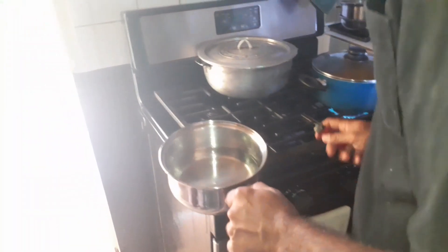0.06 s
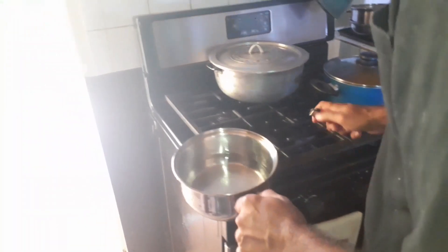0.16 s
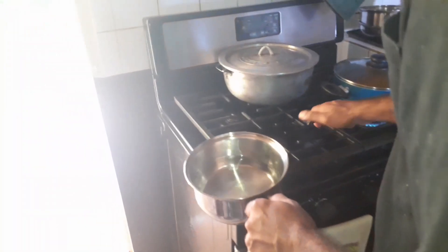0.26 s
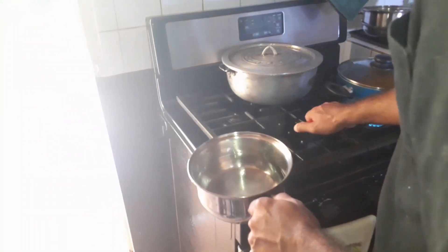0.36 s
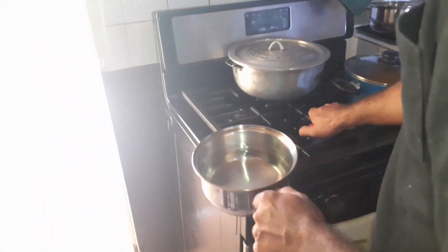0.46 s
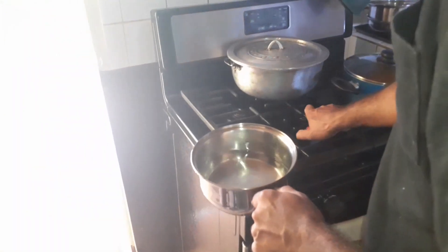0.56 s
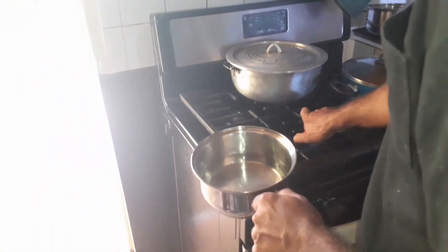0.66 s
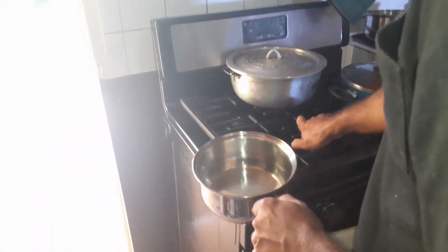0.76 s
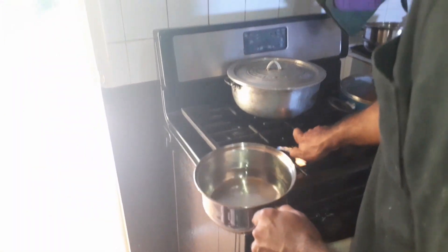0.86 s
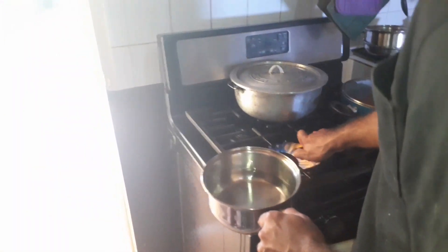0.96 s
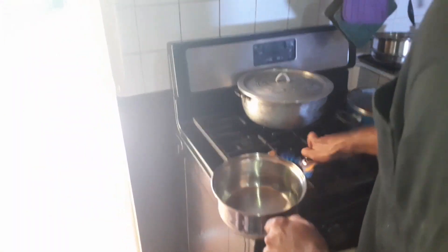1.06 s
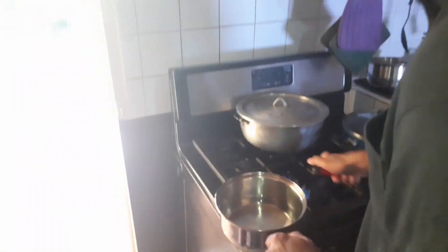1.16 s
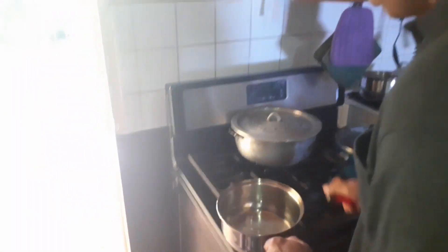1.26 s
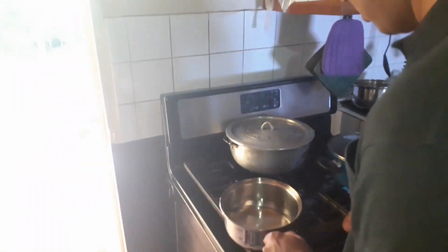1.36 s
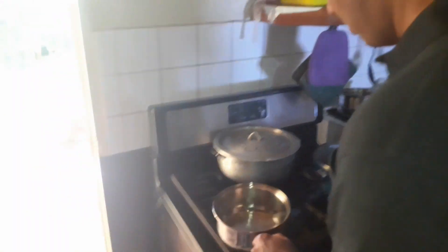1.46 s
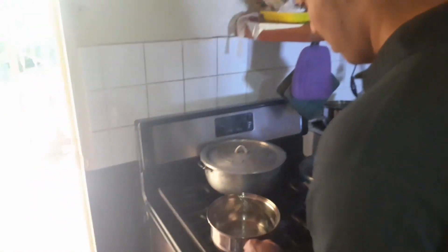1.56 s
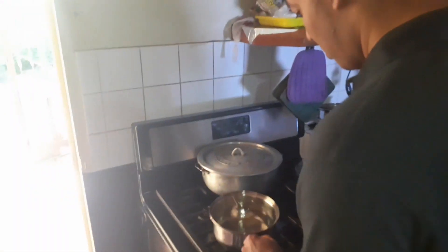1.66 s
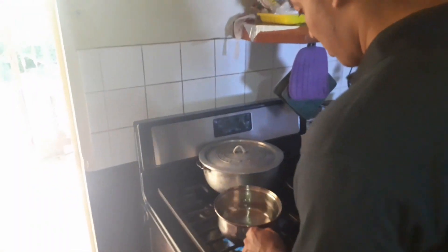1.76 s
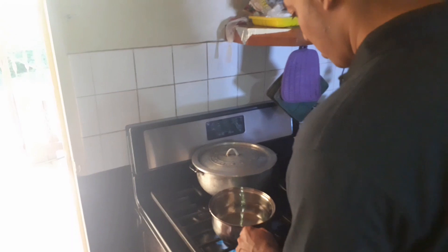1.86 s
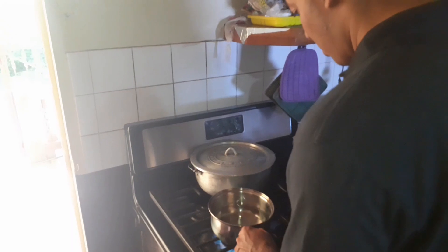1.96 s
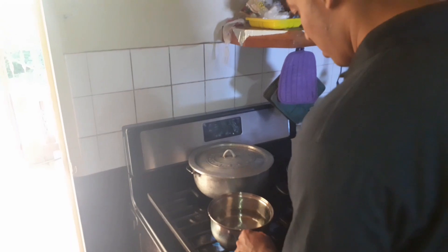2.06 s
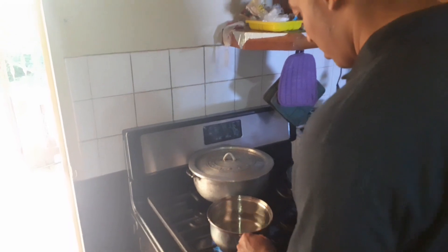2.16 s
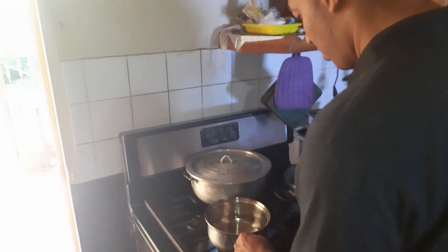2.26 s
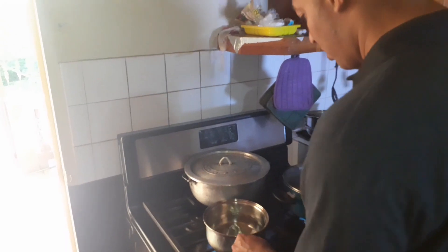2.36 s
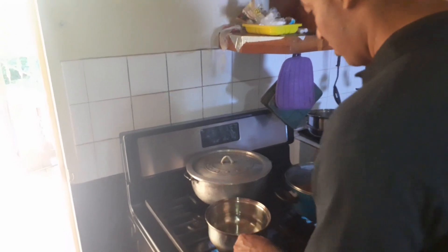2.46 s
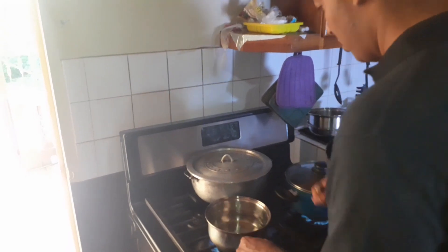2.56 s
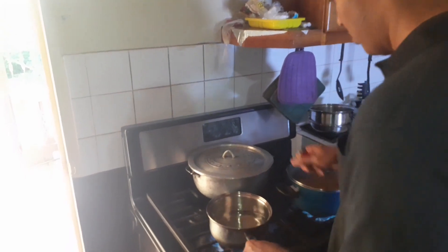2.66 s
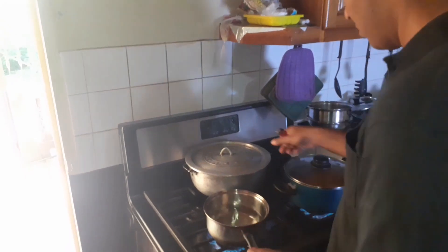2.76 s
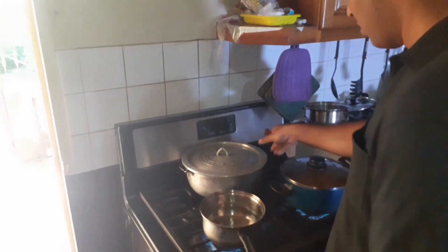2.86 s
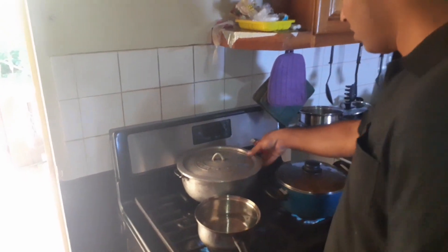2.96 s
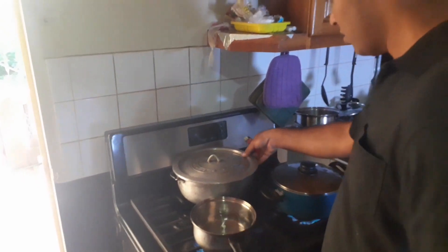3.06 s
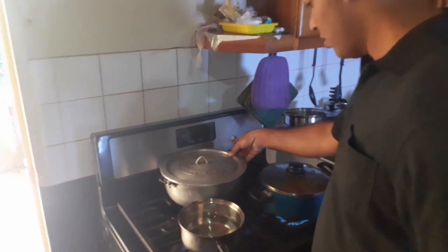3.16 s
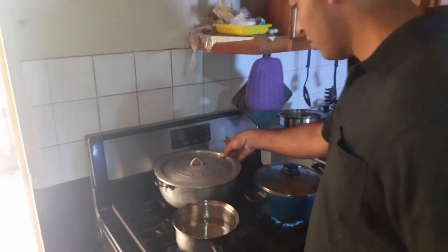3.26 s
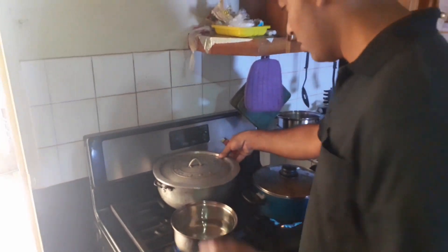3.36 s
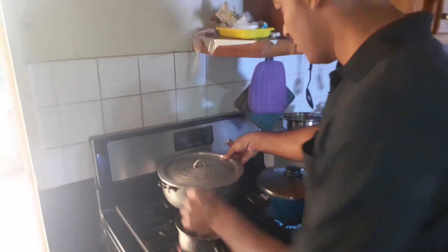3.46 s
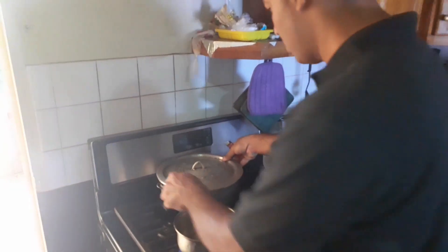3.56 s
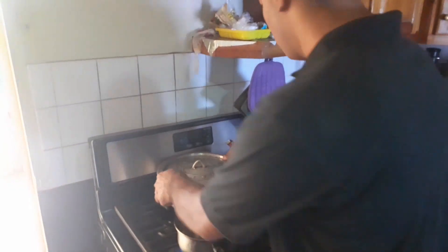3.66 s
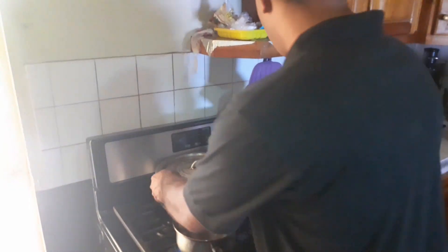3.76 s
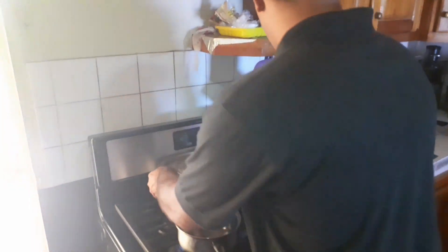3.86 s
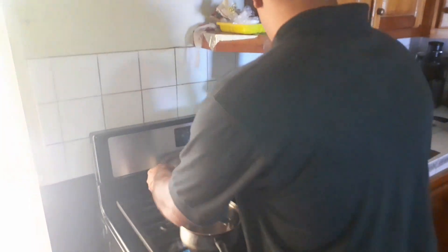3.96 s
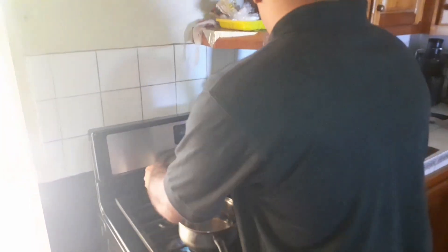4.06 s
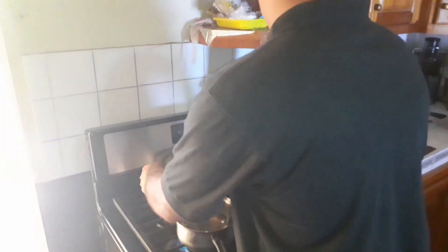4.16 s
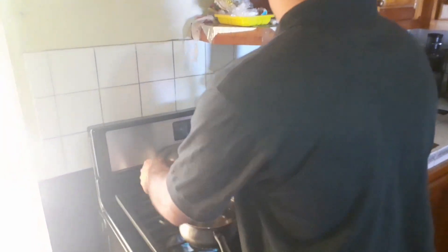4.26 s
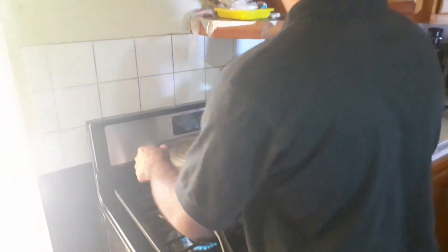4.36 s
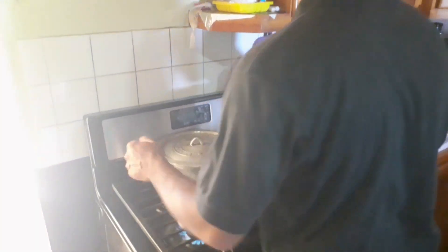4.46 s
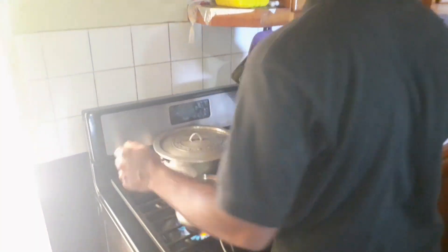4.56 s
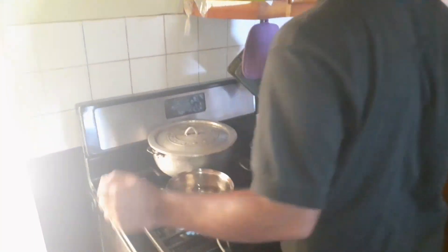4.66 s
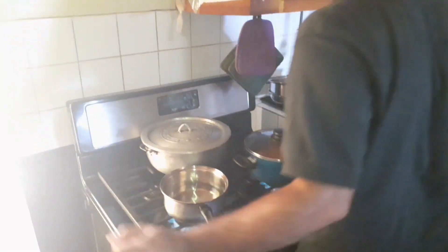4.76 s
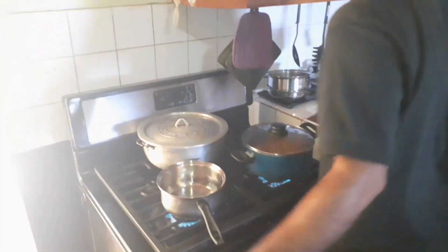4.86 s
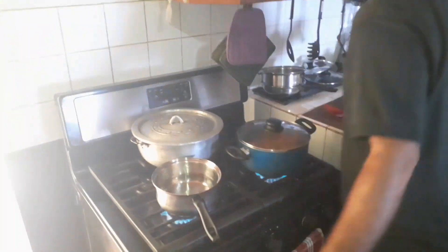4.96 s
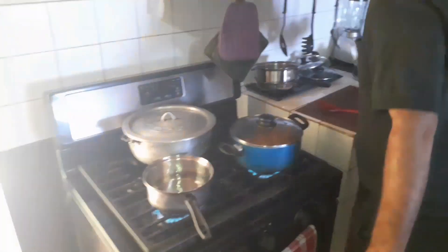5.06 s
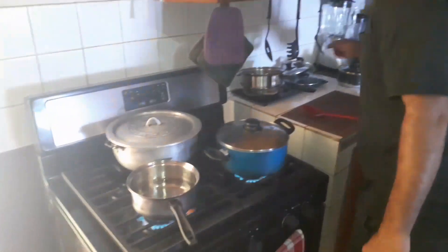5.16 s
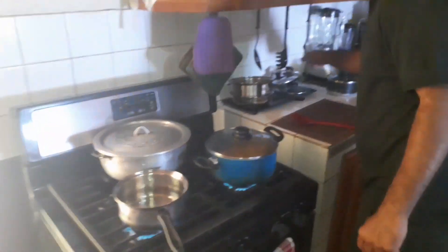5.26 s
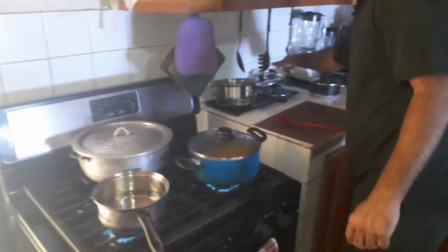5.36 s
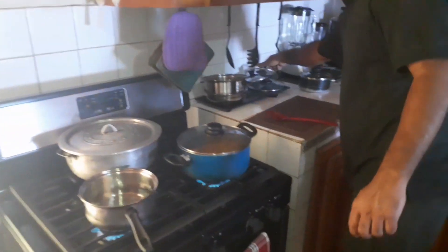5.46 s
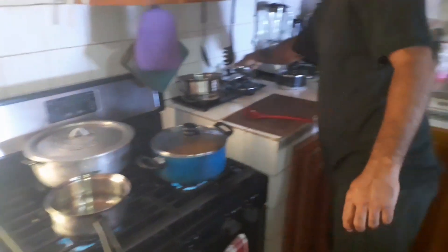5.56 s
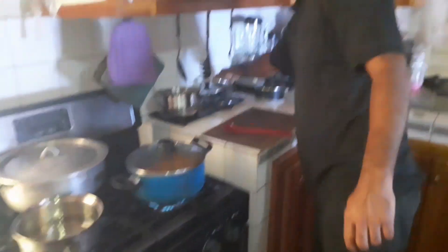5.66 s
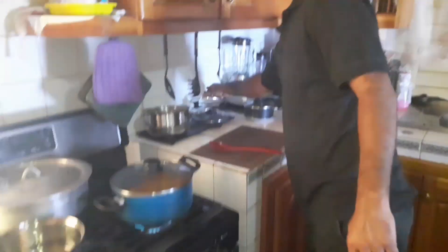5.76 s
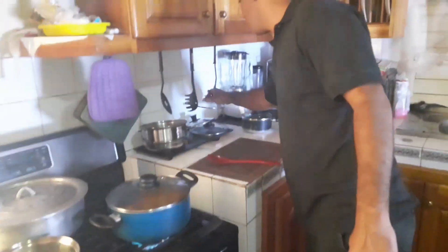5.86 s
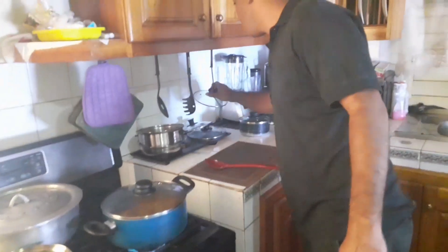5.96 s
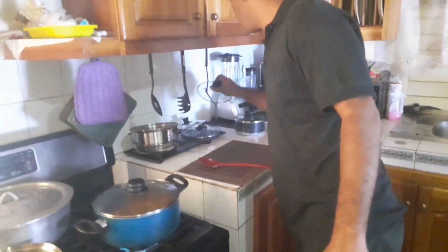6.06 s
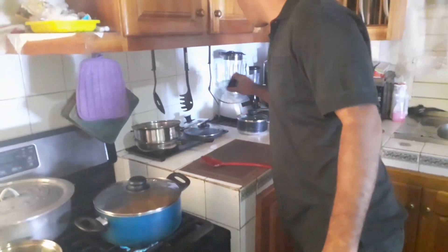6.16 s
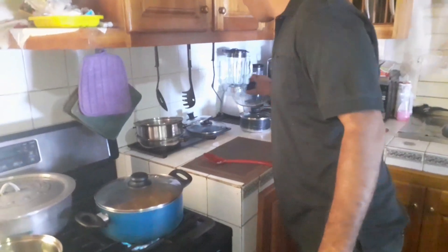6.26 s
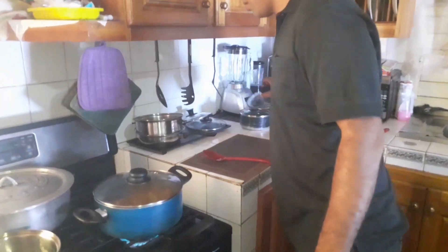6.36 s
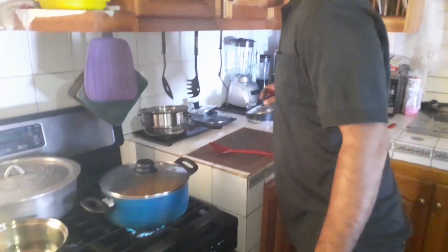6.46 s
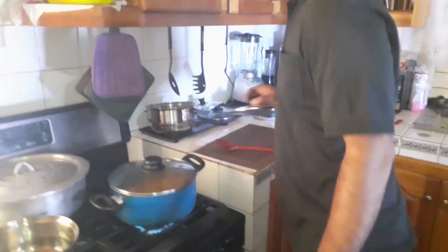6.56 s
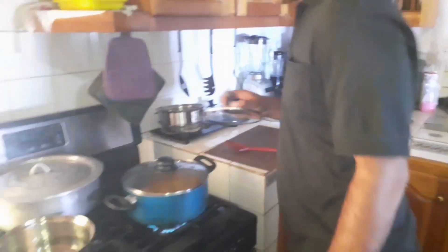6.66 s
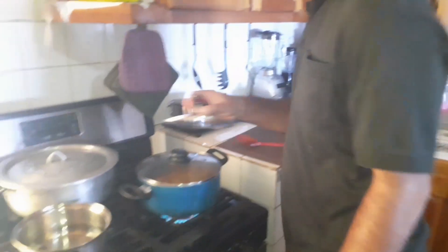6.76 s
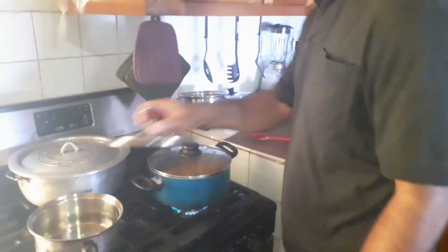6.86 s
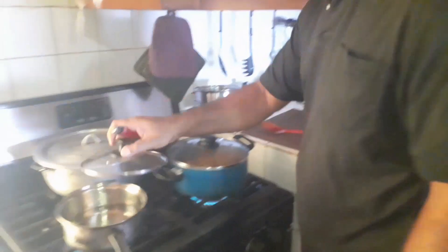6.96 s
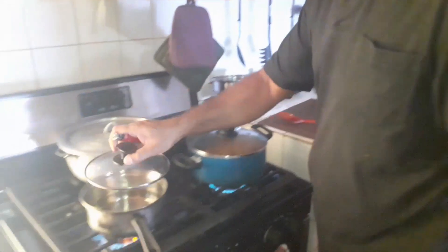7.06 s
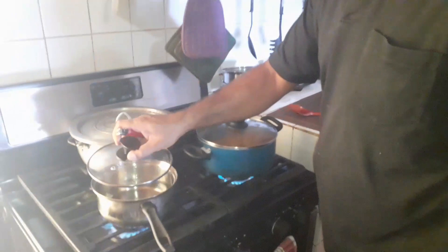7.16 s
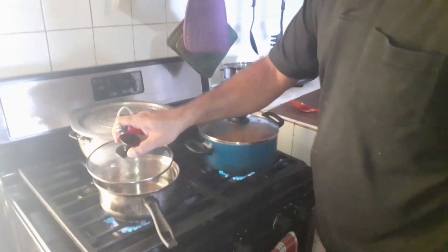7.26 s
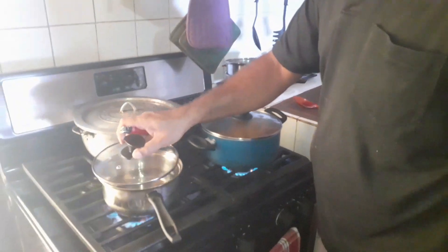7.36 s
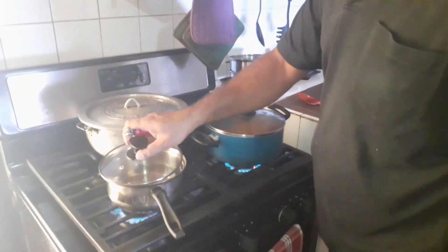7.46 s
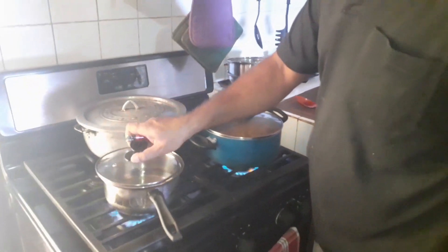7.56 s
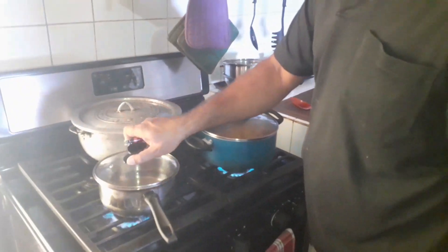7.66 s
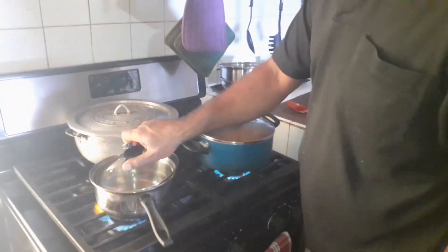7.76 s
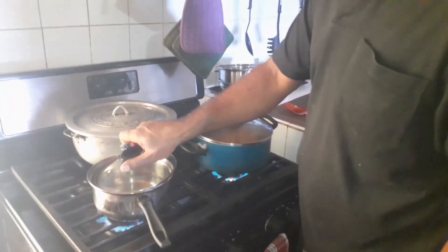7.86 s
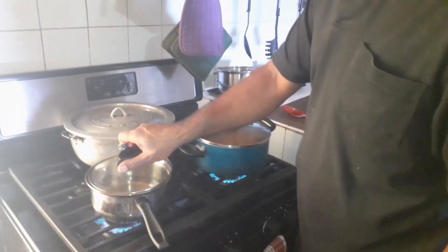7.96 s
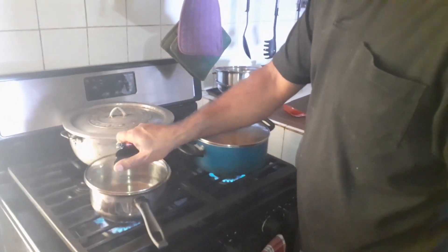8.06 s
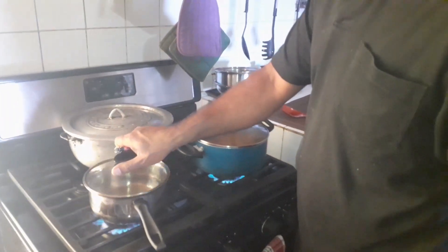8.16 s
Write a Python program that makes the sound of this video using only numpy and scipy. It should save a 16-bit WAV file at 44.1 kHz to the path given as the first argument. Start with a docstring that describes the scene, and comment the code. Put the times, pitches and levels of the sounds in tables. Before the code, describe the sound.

A gas burner softly catches, a saucepan lands on the grate, then a lid clanks loudly and rattles into place over a faint hum.

```python
"""A steel saucepan on a gas stove in a small tiled kitchen. A burner catches, the pan is set on the grate
and nudged, then a lid is fetched from the counter, clanks on the pan and is rattled into its seat.
Each impact excites the damped modes of the metal and a tail of wall echoes; blows on the pan also shake
the stove top. Motors hum, flames hiss, and the cook's hands, clothes and one step make faint sounds.
An automatic gain control ducks the level after the loud clanks."""
import sys
import numpy as np
from scipy import signal
from scipy.fft import rfft, irfft, next_fast_len
from scipy.io import wavfile
from scipy.ndimage import uniform_filter1d, map_coordinates

SR = 44100
rng = np.random.default_rng(int(sys.argv[2]) if len(sys.argv) > 2 else 0)


def generate_wav(signal):
    """Clip the signal to [-1, 1] and save it as 16-bit WAV at the path in sys.argv[1]."""
    frames = np.transpose(np.atleast_2d(signal))
    scaled = np.clip(frames, -1, 1) * 32767
    pcm = np.round(scaled).astype(np.int16)
    wavfile.write(sys.argv[1], SR, pcm)


N = 362502
BLOW_SAMPLES, TOP_HZ = SR, 15900  # longest ring of a blow; upper band limit

# Coherence of the sound field. Each row: frequency in Hz, left-right correlation.
COHERENCE = [(100, 0.99), (300, 0.9), (600, 0.74), (1200, 0), (16000, 0.054)]
# Stereo balance of sounds about the room. Each row: frequency in Hz, left minus right in dB.
ROOM_BALANCE = [(60, -15), (130, 0.5), (290, -6.5), (640, -3.5), (1410, -8.5), (3100, -6), (6820, -17.5),
                (15000, -3.5)]


def amp(db):
    """Decibels to amplitude ratio."""
    return 10 ** (np.asarray(db) / 20)


def unit(x):
    """Scale to rms 1."""
    return x / np.sqrt(np.mean(x ** 2) + 1e-20)


def along(points, hz):
    """Interpolate (Hz, value) points on a logarithmic frequency axis."""
    freqs, values = np.transpose(points)
    return np.interp(np.log(hz + 1), np.log(freqs), values)


def wobble(rate):
    """A smooth random curve with rate knots a second."""
    knots = rng.standard_normal(int(N * rate / SR) + 4)
    return map_coordinates(knots, [np.arange(N) * rate / SR])


def sides(balance_db):
    """Constant-power panning: left and right gains."""
    gains = amp(np.array([balance_db, -balance_db]) / 2)
    return gains / np.sqrt(np.mean(gains ** 2, axis=0))


def add(track, start_s, sound):
    """Superpose a sound on the track."""
    part = track[:, max(round(start_s * SR), 0):][:, :sound.shape[1]]
    part += sound[:, :part.shape[1]]


def noise(spectrum, balance, size):
    """A diffuse field of rms 1: coherent in the bass, incoherent in the treble."""
    n_fft = next_fast_len(size)
    hz = np.fft.rfftfreq(n_fft, 1 / SR)
    angle = np.arccos(np.clip(along(COHERENCE, hz), -1, 1)) / 2
    mid, side = rfft(rng.standard_normal((2, n_fft))) * [np.cos(angle), np.sin(angle)]
    pair = np.array([mid + side, mid - side]) * amp(along(spectrum, hz)) * sides(along(balance, hz))
    return unit(irfft(pair, n_fft)[:, :size])


def treble(x, gain_db, corner_hz=4200):
    """Contact hardness sets the share of high frequencies: a shelving filter."""
    low, high = (np.tile(signal.butter(2, corner_hz, kind, fs=SR, output="sos"), (2, 1))
                 for kind in ("low", "high"))
    return signal.sosfilt(low, x) + amp(gain_db) * signal.sosfilt(high, x)


def swell(rise_s):
    """Vibration builds up exponentially with time constant rise_s."""
    return 1 - np.exp(-np.arange(BLOW_SAMPLES) / SR / rise_s)


def ring(modes, balance, count, scatter_db=2):
    """Free vibration: each of count blows excites the same damped modes at new strengths and phases."""
    hz, db, t60 = np.transpose(modes)
    t = np.arange(BLOW_SAMPLES, dtype=np.float32) / SR
    shape = (count, 1, len(hz))
    strength = amp(db + scatter_db * rng.standard_normal(shape)) / np.linalg.norm(amp(db))
    spread = np.arccos(np.clip(along(COHERENCE, hz), -1, 1))
    stereo_phase = spread * rng.standard_normal(shape) * [[.5], [-.5]]
    start_phase = rng.uniform(0, 2 * np.pi, shape) + stereo_phase
    weight = np.complex64(strength * sides(along(balance, hz)) * np.exp(1j * start_phase))
    phase = np.outer(np.float32(2 * np.pi * hz), t)
    decay = np.exp(np.outer(np.float32(-np.log(1000) / t60), t))
    return (np.tensordot(weight.real, decay * np.cos(phase), 1)
            + np.tensordot(weight.imag, decay * np.sin(phase), 1))


def wash(spectrum, balance, crack_db, crack_s):
    """Reverberation: after a contact crack, wall echoes decay at each band's own rate."""
    # The tiled room. Each row: frequency in Hz, reverberation time in seconds.
    reverb_times = [(150, 0.81), (600, 0.62), (2500, 0.55), (7000, 0.41), (13000, 0.35)]
    hz, frame_s, bands = signal.stft(noise(spectrum, balance, BLOW_SAMPLES), SR, nperseg=256)
    decay = amp(-60 * frame_s / along(reverb_times, hz)[:, None])
    tail = signal.istft(bands * decay, SR, nperseg=256)[1][:, :BLOW_SAMPLES]
    return tail * (1 + amp(crack_db) * np.exp(-np.arange(BLOW_SAMPLES) / SR / crack_s))


def air_and_gas(light_s, room_db=-53, hiss_db=-58, lit_rise_db=1.5):
    """Broadband noise of room air and gas jets; the hiss rises once one more burner is lit."""
    # Background spectrum. Each row: frequency in Hz, relative density in dB.
    spectrum = [(20, -4), (60, 0), (130, 5), (230, 13.5), (360, 17), (520, 6), (1000, 3.5), (3300, -1.5),
                (5300, 3), (7300, 10.5), (8800, 4.5), (10000, -10.5), (13000, -1), (16000, -2)]
    lit = np.arange(N) / SR > light_s
    air = noise(spectrum, ROOM_BALANCE, N)
    low = signal.sosfiltfilt(signal.butter(2, 3000, fs=SR, output="sos"), air)
    room = unit(low) * amp(room_db + 0.82 * wobble(6.3))
    hiss = unit(air - low) * amp(hiss_db + lit_rise_db * lit + 0.66 * wobble(4.17))
    return room + hiss


def motor_hum(beat_hz=1.52, first_peak_s=.55):
    """Beating: among the droning motors, one runs slightly slower than the mains hum."""
    # Hum tones. Each row: frequency in Hz, level in dB, left minus right in dB.
    tones = [(65.6, -73.5, -40), (99.8, -56.5, -6), (141, -66, -14), (297, -48, -5.5)]
    mains_hz, mains_db, mains_left_db = tones[1]
    slow_motor = (mains_hz - beat_hz, mains_db - 2, mains_left_db)
    out, t = np.zeros((2, N)), np.arange(N) / SR - first_peak_s
    for hz, db, left_db in tones + [slow_motor]:
        peak = np.sqrt(2) * amp(db + 0.094 * wobble(3.7))
        phase = 2 * np.pi * hz * t + 0.19 * wobble(3.065)
        out += np.outer(sides(left_db), peak * np.sin(phase))
    return out


def resonance(centre_hz, octaves, t60):
    """One damped resonance as a band of noise; the duller the contact, the slower it builds."""
    hz = np.geomspace(20, TOP_HZ, 400)
    spectrum = np.c_[hz, -20 * np.log10(1 + (np.log2(hz / centre_hz) / octaves) ** 2)]
    rise = swell(min(12 / centre_hz, t60 / 18))
    decay = np.exp(-np.log(1000) * np.arange(BLOW_SAMPLES) / SR / t60)
    return noise(spectrum, ROOM_BALANCE, BLOW_SAMPLES) * rise * decay


def taps():
    """Light impacts of hands and utensils excite quickly damped resonances."""
    # Each row: start in seconds, level in dB, centre in Hz, width in octaves, left minus right in dB.
    contacts = [(.56, -47, 4630, .42, -2), (1.352, -47, 6700, .22, -4), (1.772, -53, 8000, 1, 0),
                (3.537, -41.5, 9800, 0.76, 3), (5.508, -48, 3940, 0.91, -1), (6.474, -46, 4270, 0.68, 0),
                (6.673, -35, 2200, .42, 5), (6.924, -38, 7700, .15, 4)]
    out = np.zeros((2, N))
    for start_s, db, hz, octaves, left_db in contacts:
        add(out, start_s, amp(db) * sides(left_db)[:, None] * resonance(hz, octaves, t60=.26))
    return out


def ignition(light_s):
    """Combustion noise: gas catches with a spit, the flame ring spreads with a whoomp and closes with a puff."""
    # Spectrum of the spit. Each row: frequency in Hz, relative density in dB.
    spit = [(350, -40), (600, -10), (2150, -10.5), (2340, -10), (2610, -12.5), (5560, -6.5), (8620, -1),
            (10500, -17), (16000, -10)]
    out, t = np.zeros((2, N)), np.arange(N) / SR
    add(out, light_s, amp(-38) * wash(spit, ROOM_BALANCE, crack_db=2, crack_s=0.0084) * swell(0.0061))
    add(out, .835, amp(-37) * wash(spit, ROOM_BALANCE, crack_db=2, crack_s=0.021) * swell(0.0013))
    add(out, .936, amp(-33) * resonance(centre_hz=454, octaves=0.65, t60=0.1))  # the puff
    whoomp = [(40, -21), (120, -4.5), (200, 0), (400, -2.5), (700, -14.5), (1500, -25), (5000, -46)]
    whoomp_db = np.interp(t, [.8, .87, .94, 1.02, 1.3], [-100, -38, -37, -41, -100])
    return out + noise(whoomp, ROOM_BALANCE, N) * amp(whoomp_db)


def metal_response(modes, spectrum, ripple_db=3, width_hz=9, damping=0.0083):
    """Damping by the grip broadens a body's main modes, over an uneven bed of lesser ones."""
    hz = np.arange(20, SR / 2, 4)
    ripple = unit(signal.convolve(rng.standard_normal(len(hz)), signal.windows.hann(27), "same"))
    bed = amp(along(spectrum, hz) + ripple_db * np.minimum(ripple, 1.5))
    power = np.zeros(len(hz))
    for mode_hz, db, _ in modes:
        band_hz = width_hz + damping * mode_hz
        power += amp(db) ** 2 / band_hz / (1 + ((hz - mode_hz) / band_hz) ** 2) ** 2
    return np.c_[hz, 20 * np.log10(np.hypot(unit(bed), .65 * unit(np.sqrt(power))))]


def metal(modes, spectrum, balance, count):
    """Impulse responses of count blows: rough partials spread by the walls, over a clean modal ring."""
    response = metal_response(modes, spectrum)
    rough = np.array([wash(response, balance, crack_db=-6, crack_s=0.042) for _ in range(count)])
    return rough + amp(-7.5) * ring(modes, balance, count)


def stove_top(balance, count):
    """Plate vibration: count thumps on the sheet-metal top, each with a shudder of the stove's body."""
    # Modes of the top. Each row: frequency in Hz, relative level in dB, t60 in seconds.
    modes = [(78, -42, 0.36), (117.6, -0.5, 0.95), (203, -30, 0.64), (215.2, 17, 0.42), (230.4, -20, 0.6),
             (268, 12, 0.18), (301.6, 3.5, 0.59)]
    # Spectrum of the shudder. Each row: frequency in Hz, relative density in dB.
    spectrum = [(30, -23), (70, -5), (120, -6), (190, -4), (320, 0), (500, -8), (1200, -20), (4000, -80)]
    shudder = np.array([wash(spectrum, balance, crack_db=-22, crack_s=.01) for _ in range(count)])
    panel = ring(modes, balance, count, scatter_db=1.5)
    return amp(3) * panel + amp(-2.5) * shudder


def grate():
    """Impact excitation: the pan lands on the iron grate, which rings and thumps the stove top."""
    # Landings. Each row: start in seconds, then relative level, treble gain and stove-top gain in dB.
    blows = [(2.112, -25, 0, -12), (2.117, -26.5, -24, -7.5), (2.27, -43.5, -4, 1), (2.41, -49.5, 24, -24)]
    # Modes of the iron. Each row: frequency in Hz, relative level in dB, t60 in seconds.
    modes = [(775, -4, .7), (845, -6, .4), (1596, -5, .3), (1647, 1, .35), (3474, -11, .4), (4936, -1, .45),
             (5272, -6, .35), (5606, -2, .3), (6177, -3, .3), (6729, 0, .45), (7224, -4, .35),
             (8672, -9, .25)]
    # Bed of lesser modes. Each row: frequency in Hz, relative density in dB.
    spectrum = [(88, -52), (150, -38), (213, -20), (280, -33), (309, -17), (601, -41), (790, -15),
                (1450, -17), (1660, -30), (1940, -28), (2220, -22), (3160, -31), (4950, -23), (6640, -14.5),
                (16000, -50.5)]
    # Stereo balance. Each row: frequency in Hz, left minus right in dB.
    balance = [(60, -4), (180, -3.5), (550, -6), (1650, -1.5), (4970, -13.5), (15000, -15)]
    out = np.zeros((2, N))
    iron = metal(modes, spectrum, balance, len(blows))
    stove = stove_top(balance, len(blows))
    for k, (start_s, db, treble_db, stove_db) in enumerate(blows):
        clank = amp(-4) * treble(iron[k], treble_db) * swell(0.00011)
        thump = amp(stove_db + 5) * stove[k] * swell(0.013)
        add(out, start_s, amp(db) * (clank + thump))
    return out


def squeaks():
    """Narrow, lightly damped resonances sound as faint squeaks and pings about the kitchen."""
    # Each row: start in seconds, level in dB, pitch in Hz, width in octaves.
    pings = [(2.413, -45.5, 2670, .03), (3.543, -46.5, 1880, .07), (4.83, -45, 600, 0.11),
             (5.469, -43, 1780, .11), (5.58, -50, 2090, .13), (5.983, -53, 3200, 0.13),
             (6.018, -43.5, 986, .25), (6.27, -47, 706, 0.18), (6.489, -44.5, 1330, 0.27),
             (6.82, -50, 870, 0.12)]
    out = np.zeros((2, N))
    for start_s, db, hz, octaves in pings:
        add(out, start_s, amp(db) * resonance(hz, octaves, t60=.45))
    return out


def rustle():
    """Friction noise of the cook's clothes swells and fades with each reach or turn."""
    # Each row: middle and half length in seconds, then level, treble gain and left minus right in dB.
    moves = [(3.26, 0.19, -49, -2, 0), (5.03, .12, -53, 6, -1.5), (5.55, 0.27, -55, 3, 0),
             (6.463, 0.56, -51.5, 1, 1.5)]
    # Spectrum of cloth. Each row: frequency in Hz, relative density in dB.
    spectrum = [(60, -4), (250, 16), (500, 9.5), (1200, 3), (3300, -3.5), (7500, 2.5), (10000, -13),
                (16000, -10.5)]
    out, t = np.zeros((2, N)), np.arange(N) / SR
    cloth = noise(spectrum, ROOM_BALANCE, N) * amp(2.7 * wobble(11))
    for middle_s, half_s, db, treble_db, left_db in moves:
        envelope = np.exp(-((t - middle_s) / half_s) ** 2 / 2)
        out += amp(db) * sides(left_db)[:, None] * treble(cloth, treble_db) * envelope
    return out


def pan_blows(bounce_loss_db=2.3, air_per_scrape=0.74):
    """Impacts on the pan: start in seconds, then relative level, treble, stove-top and air gains in dB."""
    # Nudges along the grate. Each row: start in seconds, relative level and stove-top gain in dB.
    nudges = [(3.877, -34.5, 6.5), (3.954, -30.5, -4)]
    # The lid rattling in the rim. Each row: start in seconds, relative level and scrape in dB.
    rattle = [(7.521, -16.5, 10), (7.537, -14.5, 0.5), (7.591, -22, 9), (7.609, -23, 6.5),
              (7.694, -31.5, 14.5), (7.729, -22, 7), (7.742, -16, 0), (7.791, -19.5, 2), (8.121, -42, 18),
              (8.149, -23.5, 2.5), (8.167, -28.5, 0), (8.209, -27.5, 5)]
    # How closely the lid sits. Each row: time in seconds, gain of the enclosed air in dB.
    seal = [(7.52, -1.5), (7.62, 4), (7.71, 13.5), (7.8, 3.5), (8.15, 11), (8.21, 3)]
    # nudges are dull, and the open pan holds little air
    blows = [(start_s, db, -7.5, stove_db, 4) for start_s, db, stove_db in nudges]
    # the lid strikes the rim; its one bounce drives the pan into the stove top
    strike_s, strike_db, treble_db = 7.073, -4.5, 1.5
    blows.append((strike_s, strike_db, treble_db, -33, -20))
    blows.append((strike_s + .008, strike_db - bounce_loss_db, treble_db - bounce_loss_db, -15, -20))
    for start_s, db, scrape_db in rattle:  # scraping adds treble and stirs the air under the lid
        air_db = np.interp(start_s, *np.transpose(seal)) + air_per_scrape * scrape_db
        blows.append((start_s, db, scrape_db, -11.5, air_db))
    return blows


def saucepan(graze_s=7.068):
    """Each blow rings the steel, shakes the stove top and excites the cavity resonance of the pan's air."""
    # Modes of the steel and of the air. Each row: frequency in Hz, relative level in dB, t60 in seconds.
    steel_modes = [(804, 0, .5), (1291, 2, .45), (1378, -2, .45), (1554, -7, .45), (1956, -6, .35),
                   (2153, -2, .35), (2374, -7, .4), (2889, -1, .55), (3073, -4, .4), (3908, -3, .5),
                   (4228, -5, .45), (4540, -6, .35), (5157, -2, .45), (5490, -6, .45), (5975, -7, .45),
                   (6540, -3, .35), (7170, -5, .3), (8177, -10, .3), (8850, -11, .3), (13452, -20, .15)]
    air_modes = [(349, 0, .35), (392, -4, .3), (447, -3, .45), (578, -6, .45)]
    # Bed of lesser modes. Each row: frequency in Hz, relative density in dB.
    spectrum = [(150, -21), (250, -1), (450, -17.5), (700, -12.5), (1050, -10), (1500, -13.5), (2700, -13),
                (3400, -15.5), (5000, -16.5), (7000, -14.5), (8800, -16.5), (10000, -32), (13000, -29),
                (16000, -33)]
    # Stereo balance. Each row: frequency in Hz, left minus right in dB.
    balance = [(60, -1.0), (130, -1), (290, -5), (640, -2.5), (1410, -3.5), (3100, -1), (6820, -17),
               (15000, -2)]
    out, blows = np.zeros((2, N)), pan_blows()
    steel = metal(steel_modes, spectrum, balance, len(blows))
    stove = stove_top(balance, len(blows))
    for k, (start_s, db, treble_db, stove_db, air_db) in enumerate(blows):
        tuning = 1 + 0.0218 * rng.standard_normal()  # the gap under the lid retunes the air
        cavity = ring(np.multiply(air_modes, [tuning, 1, 1]), balance, count=1)[0]
        body = (amp(stove_db - 1.5) * stove[k] + amp(air_db - 6) * cavity) * swell(1 / 300)
        clank = amp(-4.5) * treble(steel[k], treble_db) * swell(0.00075)
        add(out, start_s, amp(db) * (clank + body))
    # the lid grazes the rim just before it strikes
    add(out, graze_s, amp(-23) * resonance(centre_hz=6870, octaves=1, t60=.1))
    # a light pan cannot drive the stove's deepest bass
    return signal.sosfilt(signal.butter(2, 90, "high", fs=SR, output="sos"), out)


def footfall(start_s=4.98):
    """One soft step excites a low damped resonance."""
    out = np.zeros((2, N))
    add(out, start_s, amp(-46) * resonance(centre_hz=65, octaves=.2, t60=.5))
    return out


def lid():
    """The lid's modes ring as it knocks on the counter, farther off, while being picked up."""
    # Knocks. Each row: start in seconds, relative level in dB, treble gain in dB.
    blows = [(5.766, -21.5, 5), (6.676, -38, -4)]
    # Modes of the lid. Each row: frequency in Hz, relative level in dB, t60 in seconds.
    modes = [(672, -4, .4), (925, -4, .4), (1219, -2, .55), (1585, -3, .35), (2225, -5, .4), (3453, 0, .5),
             (4177, 0, .45), (4893, -4, .35)]
    # Bed of lesser modes. Each row: frequency in Hz, relative density in dB.
    spectrum = [(210, -51), (350, -2), (1020, -2), (1260, 2.5), (1940, -11), (2270, -7), (3230, -15.5),
                (3390, -19), (4180, -8), (8040, -12), (9900, -29), (13400, -30), (16000, -33)]
    # Stereo balance. Each row: frequency in Hz, left minus right in dB.
    balance = [(60, -5.0), (240, -6), (950, -4.5), (3770, -5.5), (15000, -25)]
    out = np.zeros((2, N))
    knocks = metal(modes, spectrum, balance, len(blows))
    for knock, (start_s, db, treble_db) in zip(knocks, blows):
        add(out, start_s, amp(db - 11.5) * treble(knock, treble_db) * swell(0.00075))
    return out


def scene(light_s=.822):
    """Superposition of all sources at two microphones; the burner catches at light_s."""
    cookware = saucepan() + grate() + lid()
    cook = taps() + squeaks() + footfall()
    return cookware + cook + ignition(light_s) + rustle() + air_and_gas(light_s) + motor_hum()


def record(dry, threshold_db=-19, slope=0.48, release_db_per_s=4):
    """Compression: the gain drops quickly on loud sound and recovers over seconds; then a band limit."""
    power = uniform_filter1d(np.mean(dry ** 2, axis=0), size=256)
    level_db = 10 * np.log10(np.abs(power) + 1e-12)
    cut_db = np.maximum(level_db - threshold_db, 0) * slope
    recovery_db = release_db_per_s * np.arange(N) / SR
    duck_db = np.maximum.accumulate(cut_db + recovery_db) - recovery_db
    n_fft = next_fast_len(N + SR // 2)
    passband = np.fft.rfftfreq(n_fft, 1 / SR) < TOP_HZ
    return irfft(rfft(dry * amp(-duck_db), n_fft) * passband, n_fft)[:, :N]


dry = scene()
out = record(dry)
generate_wav(out)
```